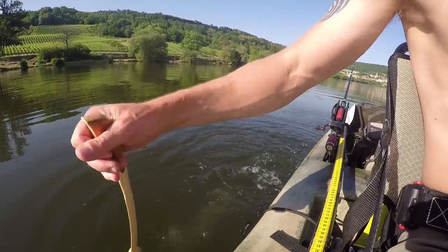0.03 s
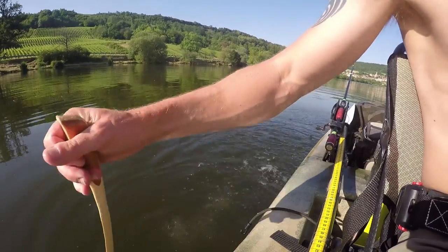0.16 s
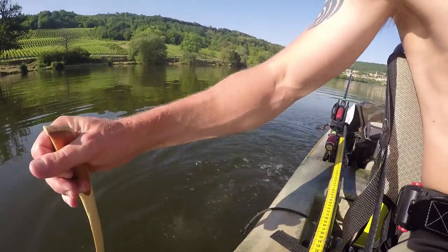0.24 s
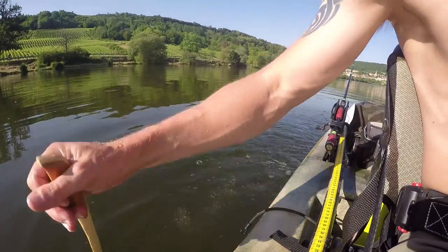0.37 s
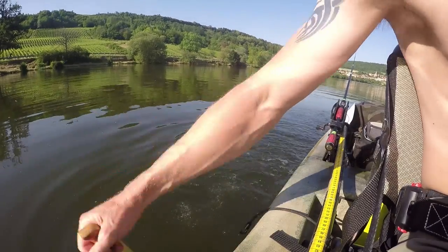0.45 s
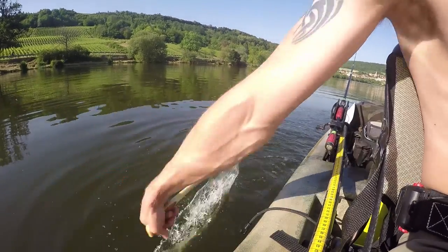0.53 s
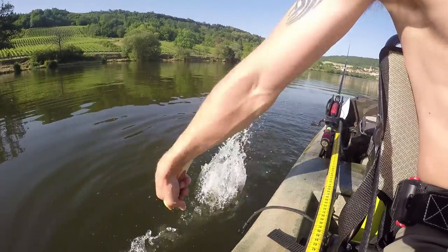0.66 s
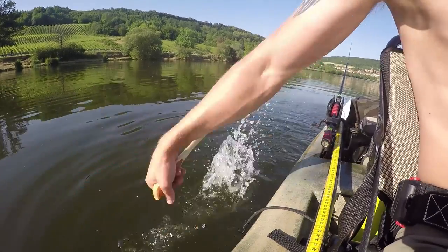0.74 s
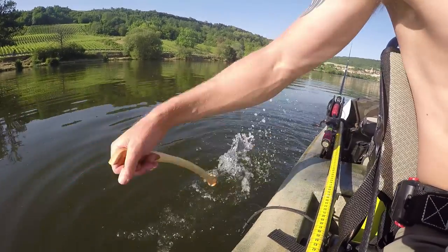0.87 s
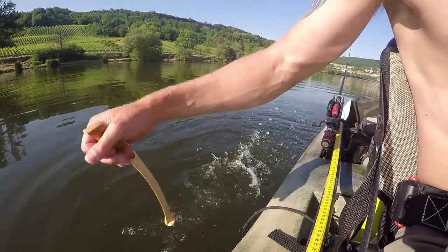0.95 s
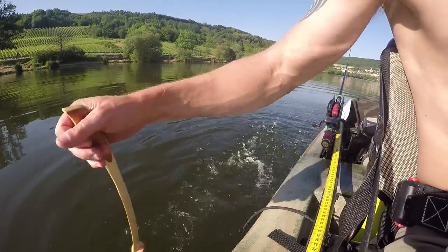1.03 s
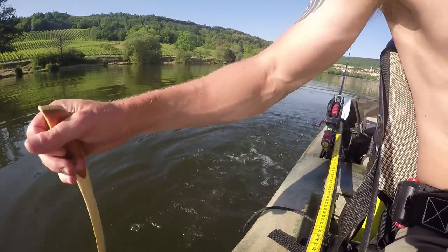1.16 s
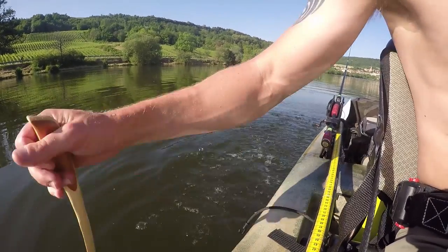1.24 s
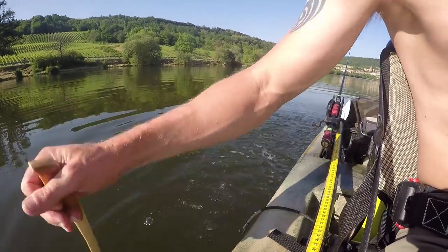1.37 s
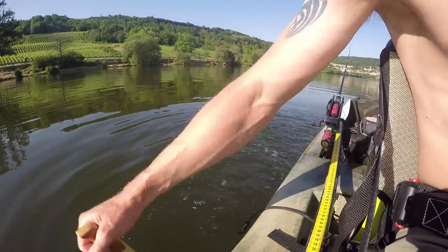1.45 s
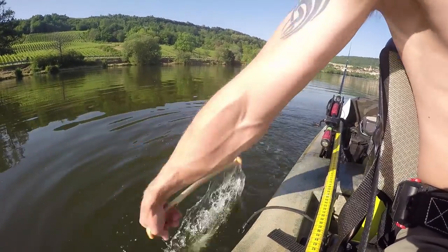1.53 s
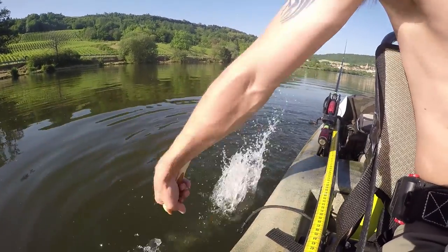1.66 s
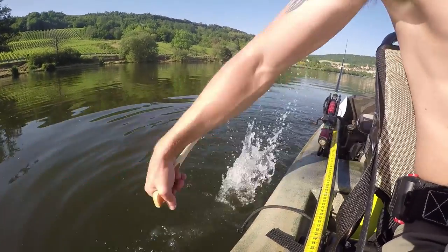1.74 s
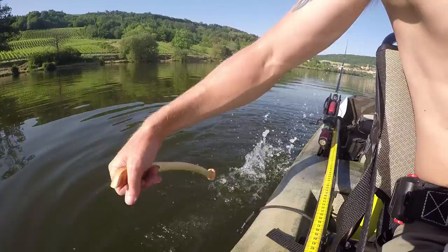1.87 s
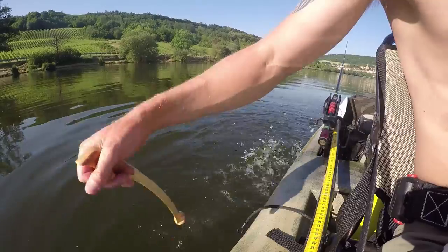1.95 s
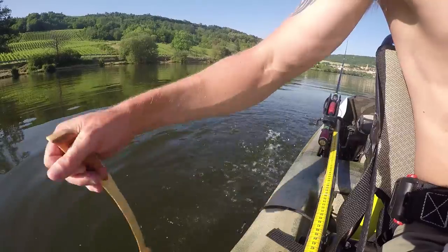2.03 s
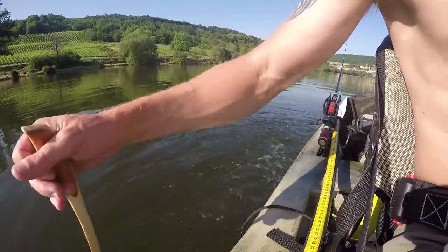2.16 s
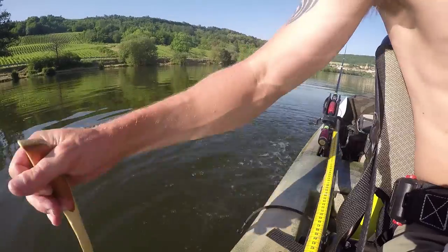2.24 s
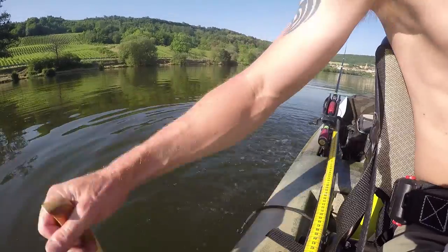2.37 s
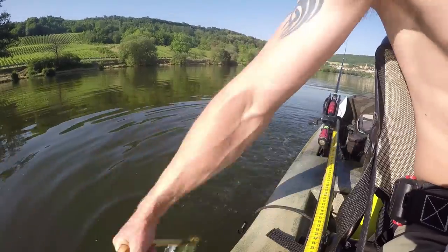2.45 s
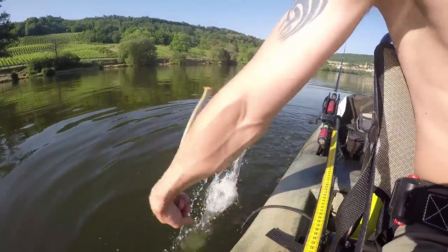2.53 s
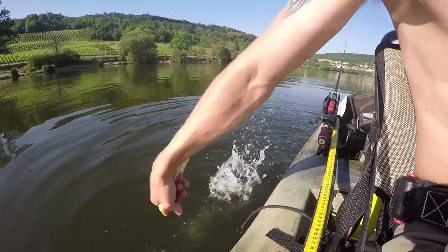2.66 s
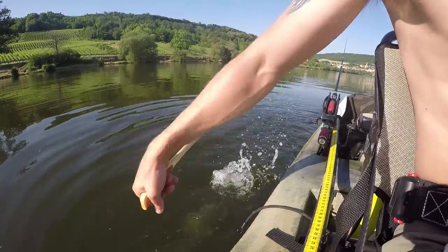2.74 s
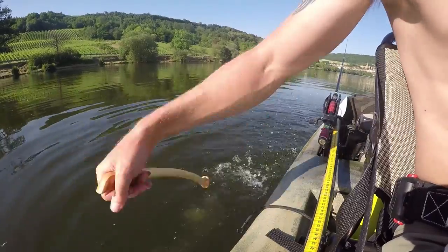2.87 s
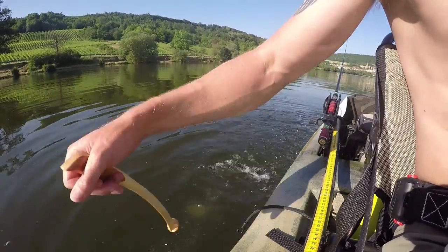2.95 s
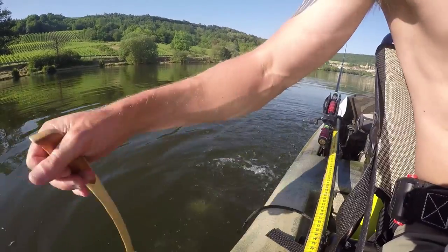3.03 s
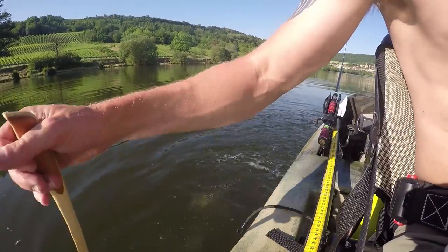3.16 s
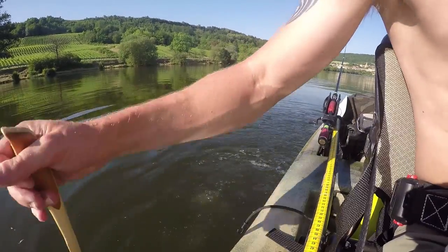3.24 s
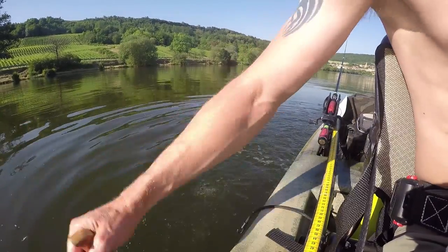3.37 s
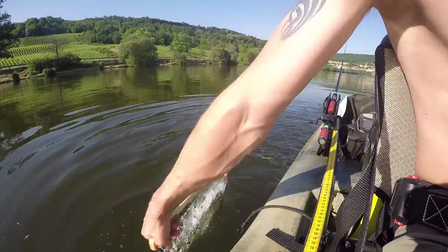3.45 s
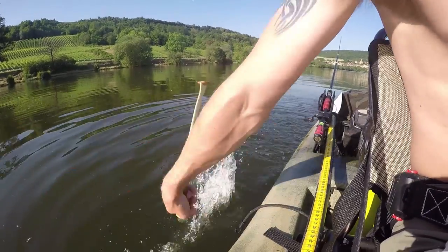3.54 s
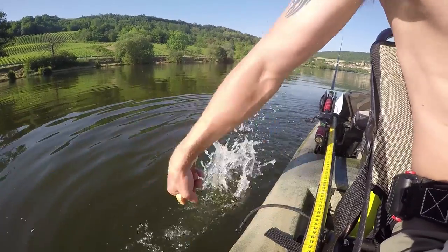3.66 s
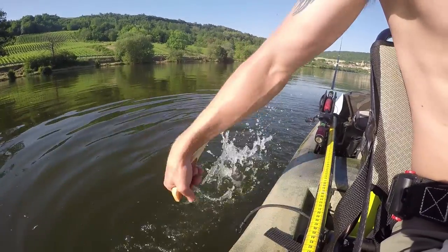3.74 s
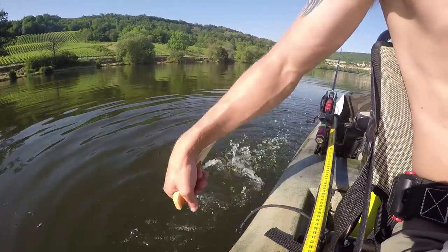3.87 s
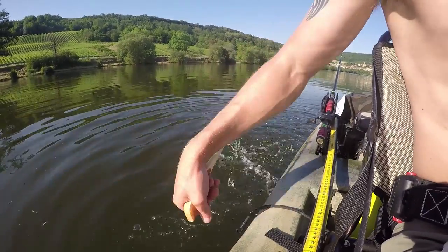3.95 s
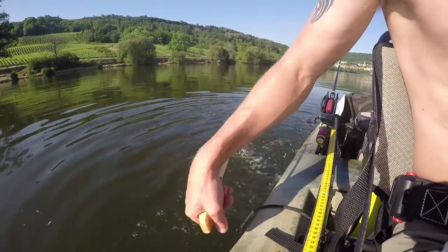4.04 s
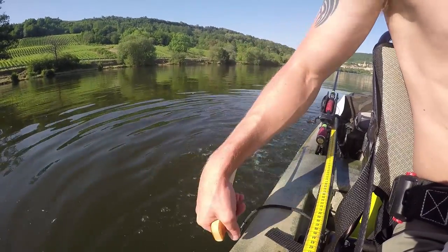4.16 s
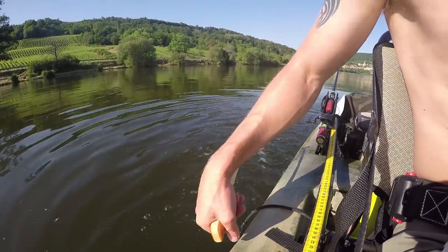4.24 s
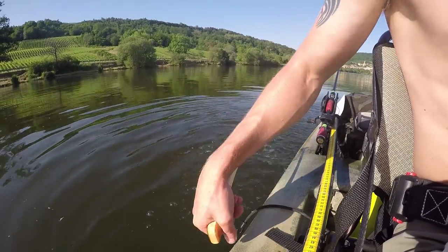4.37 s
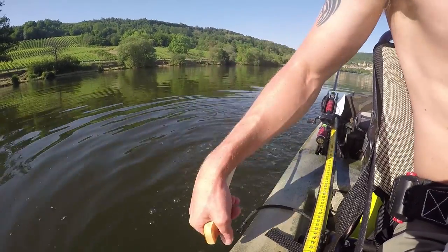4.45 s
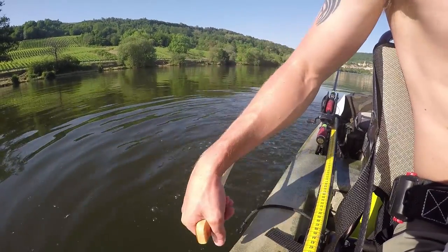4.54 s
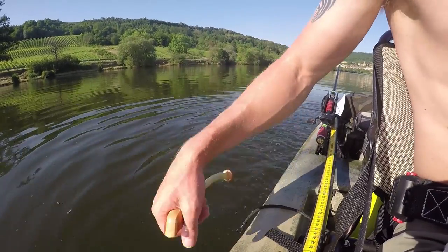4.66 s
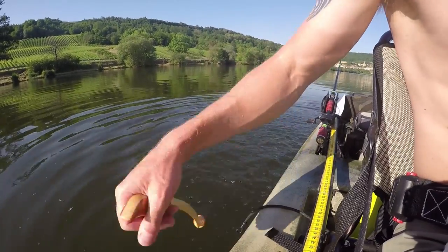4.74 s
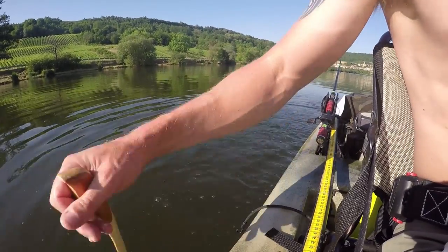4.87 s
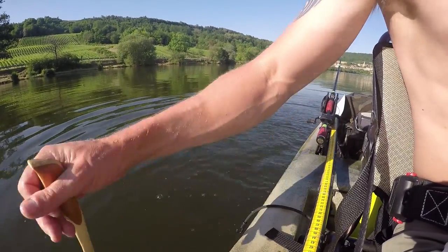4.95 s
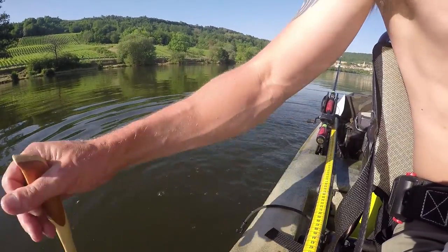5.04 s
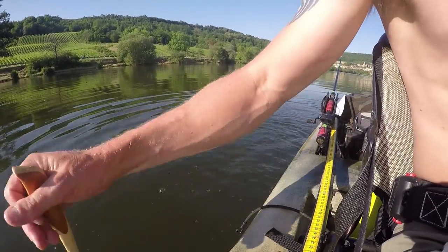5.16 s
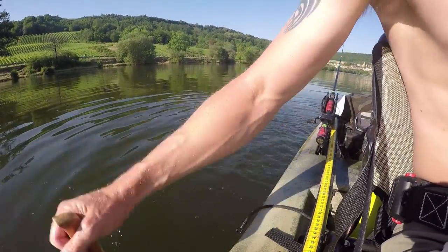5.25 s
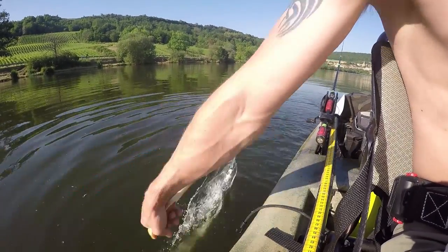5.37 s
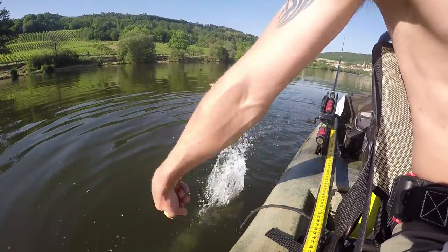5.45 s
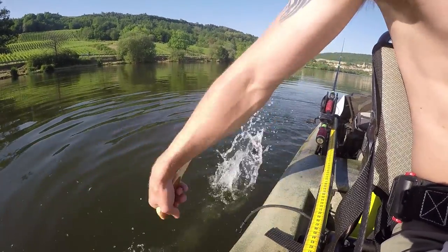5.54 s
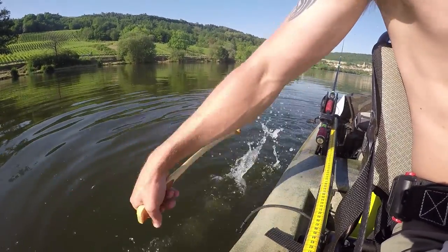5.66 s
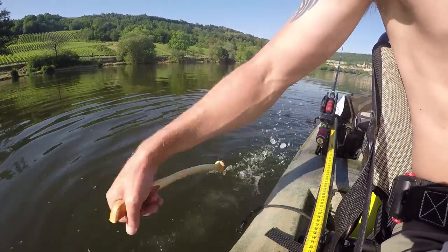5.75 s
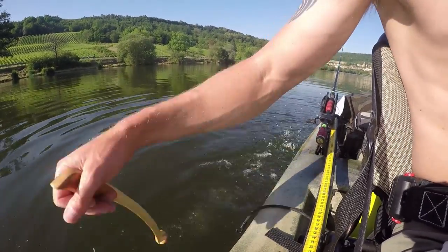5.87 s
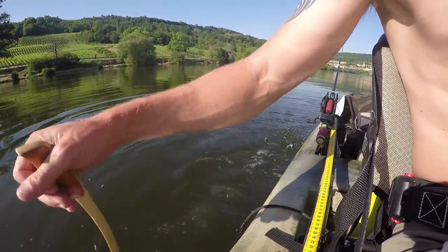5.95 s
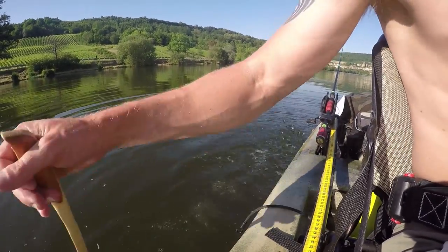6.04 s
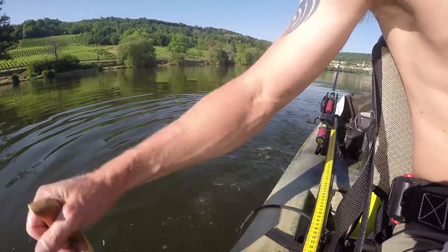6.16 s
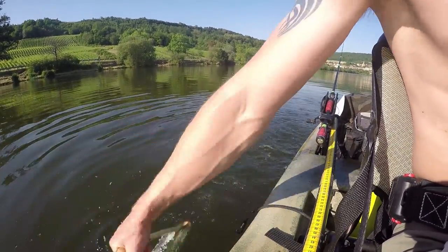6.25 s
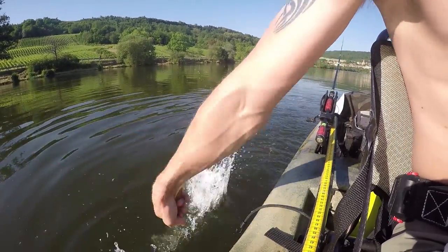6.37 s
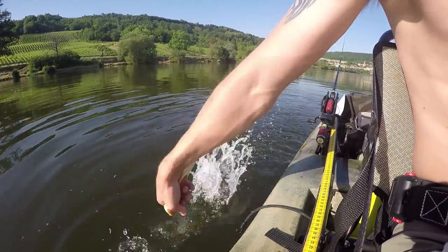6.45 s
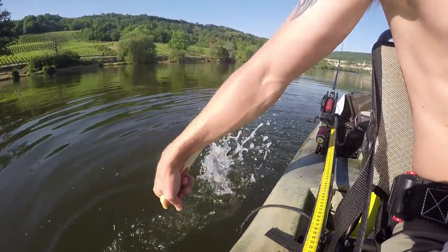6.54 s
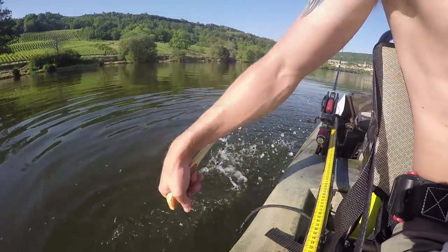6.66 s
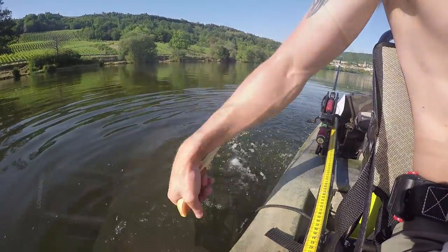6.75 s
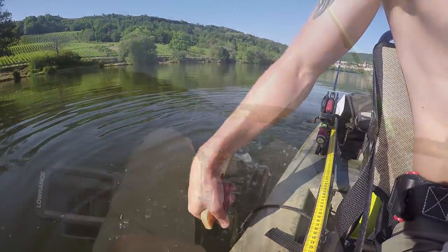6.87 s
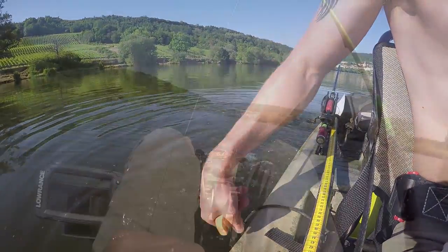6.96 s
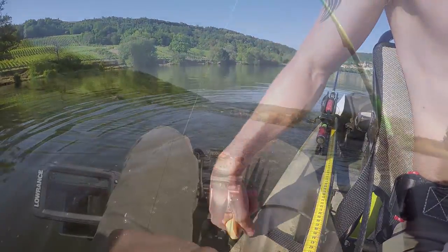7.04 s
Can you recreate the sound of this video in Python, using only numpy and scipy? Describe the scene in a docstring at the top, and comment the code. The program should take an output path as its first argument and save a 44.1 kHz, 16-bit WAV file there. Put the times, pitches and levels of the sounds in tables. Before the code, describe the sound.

A wooden clonk slaps the river surface about once a second, gulping air into deep booming plops, then droplets fizz and patter back.

```python
"""On a calm river, from an inflatable boat: a wooden clonk strikes the water six times, close to the microphone.
Each stroke slaps the surface with a ragged noise burst and a dull knock, and drags down a pocket of air,
a low throbbing tone that pinches off and rings as a rising plop.
Spray patters back as swarms of small bubbles over noise, with single drops and heavier plunks.
Light wind, as low noise, rumbles on the microphone; far off on the bank, birds whistle in gliding tones."""
import sys
import numpy as np
from scipy import signal
from scipy.fft import rfft, irfft, next_fast_len
from scipy.io import wavfile
from scipy.ndimage import uniform_filter1d, minimum_filter1d, map_coordinates

SR = 44100
rng = np.random.default_rng(int(sys.argv[2]) if len(sys.argv) > 2 else 0)


def unload_wav(signal):
    """Save mono or channel-first audio to the path in sys.argv[1] as 16-bit WAV at rate SR, clipped to [-1, 1]."""
    wavfile.write(
        sys.argv[1],
        SR,
        np.round(np.clip(np.atleast_2d(signal).T, -1, 1) * 32767).astype(np.int16),
    )


N = 313265  # length in samples

# Levels in the tables are relative: the layers and the mix add their own gains.
# breeze at the microphone: (time [s], level [dB])
BREEZE = [(0.0, -51), (1.4, -49.5), (3.3, -50), (4.8, -48.5), (5.2, -46.5), (5.8, -54), (6.3, -45),
          (7.1, -46.5)]
# spectrum of the low wind rumble: (frequency [Hz], density [dB])
RUMBLE_SPECTRUM = [(11, -40.5), (18, -2), (43, -0.5), (57, -5.5), (80, -12), (130, -16.5), (178, -21),
                   (329, -32.5), (434, -37), (600, -38), (780, -63), (1320, -120)]
# spectrum of the open air of the valley: (frequency [Hz], density [dB])
AIR_SPECTRUM = [(150, -31.5), (250, -1), (385, 0.5), (490, -9), (897, -14), (1310, -18), (2850, -18),
                (3390, -20), (3760, -20), (4240, -20), (15500, -31.5)]
# spray thrown up by a stroke: (thrown [s], flight until most lands [s], scatter of the landing [s],
# churned water [dB], first fizz [dB], landing patter [dB], landing gurgle [dB])
SHOWERS = [(-0.4, 0.36, 0.082, -60, -54, -62, -52.5), (0.65, 0.4, 0.045, -40, -50.5, -46, -51),
           (1.65, 0.37, 0.05, -43.5, -51, -45.5, -51), (2.615, 0.28, 0.042, -47.5, -54.5, -51, -54.5),
           (3.58, 0.34, 0.1, -43.5, -49, -47.5, -57), (5.483, 0.39, .06, -44, -57, -51.5, -57),
           (6.402, 0.4, 0.051, -45.5, -54, -46.5, -65.5)]
# spectrum of the fine patter: (frequency [Hz], density [dB])
PATTER_SPECTRUM = [(500, -23), (1200, -7.5), (1700, -8), (2400, 0), (3500, -7.5), (4500, -5), (6300, -7),
                   (7500, -14.5), (9500, -19), (13000, -14), (15500, -23)]
# spectrum of the lower gurgle and the splats: (frequency [Hz], density [dB])
GURGLE_SPECTRUM = [(150, -20), (400, 8), (700, 2), (1000, 2), (1500, -10.5), (2200, -18), (5000, -77)]
# loudest single drops: (time [s], level [dB], pitch [Hz])
DROPS = [(0.0725, -39.5, 3500), (0.7802, -27.5, 2700), (0.7845, -30.5, 4000), (0.892, -34, 2730),
         (0.9378, -34.5, 1640), (1.1972, -41.5, 4530), (1.263, -43.5, 3650), (1.5805, -37, 1450),
         (1.8446, -32, 2860), (1.9737, -30, 2190), (2.0473, -29.5, 1900), (2.0619, -29.5, 2360),
         (2.823, -34.5, 2600), (3.2826, -44.5, 1630), (3.801, -31, 2690), (4.0326, -32, 2310),
         (5.6466, -34, 2640), (5.773, -32.5, 2580), (5.814, -33.5, 2730), (5.828, -31.5, 2300),
         (5.8423, -22.5, 1850), (5.9419, -26, 4260), (6.654, -35.5, 3680), (6.7128, -30.5, 2720)]
# far birds: (time [s], length [s], start [Hz], middle [Hz], end [Hz], level [dB])
BIRD_CALLS = [(0.442, 0.13, 1770, 1740, 1660, -66), (1.21, 0.064, 3950, 3600, 3460, -63),
              (1.354, 0.052, 3440, 3900, 2850, -56.5), (2.169, .09, 3400, 3300, 3130, -67),
              (2.381, 0.062, 3570, 3660, 3450, -59.5), (3.216, 0.31, 1710, 1633, 1560, -65),
              (3.25, 0.052, 3350, 3190, 2860, -61.5), (4.257, 0.21, 2870, 2290, 2030, -67),
              (4.48, 0.056, 3200, 3180, 2940, -63.5), (4.55, 0.062, 2540, 2530, 2500, -63),
              (4.66, 0.072, 2370, 2310, 2400, -67.5)]
# blade cutting the surface: (time [s], thin hiss [dB], surge ahead of the head [dB], tearing at pinch-off [dB])
BLADE_CUTS = [(0.572, -48, -24, -30.5), (1.580, -43.5, -30, -32), (2.545, -46, -31.5, -35.5),
              (3.505, -44, -23, -30.5), (5.391, -46.5, -45, -33.5), (6.333, -45.5, -22.5, -33)]
# spectrum of the blade's thin hiss: (frequency [Hz], density [dB])
SLICE_SPECTRUM = [(400, -4), (1200, -14), (2600, -8), (4500, -6.5), (6300, -6.5), (8000, -19.5),
                  (15500, -16.5)]
# slaps of the head and the water behind it: (time [s], level [dB], brightness [dB per octave])
SLAP_HITS = [(0.613, -31.5, 4), (.633, -20.5, 0.5), (.6365, -19, 0), (1.6261, -17, -1), (1.632, -27, -3),
             (2.568, -20.5, -0.5), (2.617, -24, -6), (3.541, -30.5, -1), (3.565, -14.5, -4.5),
             (3.574, -14.5, -6), (5.4263, -16, -2.5), (6.394, -27.5, 1.5), (6.398, -26, -10)]
# spectrum of a slap before its brightness tilt: (frequency [Hz], density [dB])
SLAP_SPECTRUM = [(150, -37.5), (450, 0), (750, -6.5), (1300, -7.5), (2300, -2), (3200, -10), (4200, -8),
                 (6200, -13), (7800, -20.5), (11000, -21.5), (15500, -25.5)]
# wooden head meeting the water: (time [s], level [dB])
HEAD_KNOCKS = [(0.631, -8.5), (1.622, -8.5), (2.564, -15.5), (3.556, -16), (5.421, -9), (6.386, -16.5)]
# spectrum of the wooden head: (frequency [Hz], density [dB])
WOOD_SPECTRUM = [(100, -39), (250, 13), (430, 5), (700, -14), (1200, -24.5), (3000, -48)]
# dragged air pocket: (pinch-off [s], open before that for [s], throb [dB], plop [dB],
# start [Hz], end [Hz], glide [s], ring [s])
STROKES = [(0.6502, 0.015, -7.5, 0.9, 145, 432.5, 0.029, 0.028),
           (1.6514, 0.024, -6.5, .5, 172, 386, 0.014, 0.026),
           (2.6150, 0.045, -10, 1.5, 169, 428, 0.007, 0.017),
           (3.579, 0.017, -9.5, 0.1, 157, 372.5, 0.0238, 0.034),
           (5.483, .058, -12.5, -3.5, 243, 480, 0.017, 0.022),
           (6.402, 0.0085, -11, 1.5, 131, 457, 0.033, 0.036)]
# larger lumps of water plunging in: (time [s], level [dB], pitch [Hz])
LUMPS = [(0.724, -25.5, 480), (0.863, -37, 600), (0.894, -30.5, 856), (0.974, -21.5, 349),
         (0.988, -29, 417), (1.858, -32.5, 1075), (2.101, -35, 460), (2.752, -34, 785), (3.786, -20, 400),
         (3.918, -30.5, 530), (3.977, -33, 937), (4.075, -37, 1000), (4.482, -33.5, 388),
         (5.836, -31.5, 1090)]
# resonances of the microphone's housing: (frequency [Hz], width [Hz], level over the direct sound [dB])
HOUSING_MODES = [(1093, 140, 0), (1492, 36, -12.5), (2735, 170, -2), (4620, 146, 2.5), (5420, 110, -2.5),
                 (12560, 1410, -6.5)]

AIR_DB = -58.5
CHURN_DB_PER_S, CHURN_LOW_DB = 116, 4  # settling of the churned water; its gurgle over its patter
FIZZ_LOW_DB, TRAIL_DB_PER_S = -4, 61  # gurgle under the first fizz; thinning of the stragglers
WASH_DB, WASH_RISE_S, WASH_DB_PER_S = -34, 0.068, 39.5  # heave of the water after each stroke
TOP_HZ = 15600  # band limit


def amp(db):
    """Decibels to gain."""
    return 10 ** (np.asarray(db) / 20)


def unit(x):
    """x scaled to rms 1."""
    return x / np.sqrt(np.mean(x ** 2) + 1e-20)


def seconds(length):
    """A time axis of the given length in seconds."""
    return np.arange(int(length * SR)) / SR


def add(track, s, sound):
    """Mix a sound into the track at time s."""
    start = max(round(s * SR), 0)
    track[start:start + len(sound)] += sound[:len(track) - start]


def wobble(rate):
    """A smooth random curve, rate knots a second."""
    knots = rng.standard_normal(int(N * rate / SR) + 4)
    return map_coordinates(knots, [np.arange(N) * rate / SR])


def coloured(x, spectrum):
    """x shaped by (frequency [Hz], density [dB]) points, at rms 1."""
    hz, db = np.transpose(spectrum)
    grid = np.fft.rfftfreq(len(x), 1 / SR)
    gain = amp(np.interp(np.log(grid + 1), np.log(hz), db))
    return unit(irfft(rfft(x) * gain, len(x)))


def noise(spectrum, size):
    """Random noise coloured by a spectrum."""
    return coloured(rng.standard_normal(next_fast_len(size)), spectrum)[:size]


def bubble(t, hz, cycles, rise):
    """A small bubble dies within some cycles while its pitch climbs."""
    age = t * hz / cycles
    tone = np.sin(2 * np.pi * hz * t * (1 + rise * np.tanh(age / 2) / 2))
    return tone * np.exp(-age) * (1 - np.exp(-2 * t * hz))


def bubbles(low_hz, high_hz, cycles, spread_db, count):
    """A steady swarm of bubbles of random pitch and strength, rms 1."""
    when, pitch, size = rng.random((count, 3)).T[:, :, None]
    hz = low_hz * (high_hz / low_hz) ** pitch
    t = seconds(min(10 / low_hz, .012))
    strength = np.sqrt(hz) * amp(-spread_db * np.log(size + .02))
    fade_out = 1 - (t / t[-1]) ** 4
    grains = strength * bubble(t, hz, cycles, .15) * fade_out
    index = (when * N).astype(int) + np.arange(len(t))
    return unit(np.bincount(index.ravel(), grains.ravel(), N)[:N])


def outdoors(wind_db=3, gust_db=2, air_db=-1):
    """Light wind rumbles on the microphone over the faint hiss of the valley, both as wavering noise."""
    s, db = np.transpose(BREEZE)
    breeze_db = np.interp(np.arange(N) / SR, s, db) + wind_db + gust_db * wobble(4.1)
    rumble = amp(breeze_db) * noise(RUMBLE_SPECTRUM, N)
    air = amp(AIR_DB + air_db + 0.64 * wobble(3.9)) * noise(AIR_SPECTRUM, N)
    return rumble + air


def spray(patter_db=-3, gurgle_db=-2.5, mist=0.9, drip=0.56, clump_db=2.0, swell_s=0.01):
    """Churned water settles, thrown water fizzes and lands in clumps: fine patter with drips over a gurgle."""
    t = np.arange(N) / SR
    high_power, low_power = np.zeros(N), np.zeros(N)
    for thrown, flight, scatter, churn_db, fizz_db, land_db, land_low_db in SHOWERS:
        age = np.maximum(t - thrown, 0)
        swell = 1 - np.exp(-age / swell_s)
        churn = swell * amp(churn_db - CHURN_DB_PER_S * age)
        # stragglers trail off once most has landed
        fizz = swell * amp(fizz_db - TRAIL_DB_PER_S * np.maximum(age - flight, 0))
        landing = swell * np.exp(-((age - flight) / scatter) ** 2 / 2)
        high_power += churn ** 2 + fizz ** 2 + (amp(land_db) * landing) ** 2
        low_power += (amp(CHURN_LOW_DB) * churn) ** 2 + (amp(FIZZ_LOW_DB) * fizz) ** 2
        low_power += (amp(land_low_db) * landing) ** 2
    fine = bubbles(1337, 15000, cycles=13.0, spread_db=2.5, count=11000)
    drips = bubbles(1210, 7000, cycles=2.0, spread_db=4.0, count=450)
    patter = coloured(fine + drip * drips + mist * rng.standard_normal(N), PATTER_SPECTRUM)
    lower = bubbles(410, 1920, cycles=7.8, spread_db=2.0, count=2000)
    gurgle = coloured(lower + mist * rng.standard_normal(N), GURGLE_SPECTRUM)
    high = amp(patter_db) * np.sqrt(high_power) * patter
    low = amp(gurgle_db) * np.sqrt(low_power) * gurgle
    return (high + low) * amp(clump_db * wobble(90))


def drops(tick_db=-8, tick_t60_s=0.028, ring_db=1.0):
    """Each drop ticks on the surface and traps a small bubble; the tick is coloured around its pitch."""
    out, t = np.zeros(N), seconds(.05)
    for s, db, hz in DROPS:
        colour = [(hz / 4, -20), (hz * .7, -3), (hz, 0), (hz * 1.5, -7), (hz * 3, -22)]
        decay = amp(tick_db - 60 * t / tick_t60_s)
        tick = decay * noise(colour, len(t)) * (1 - np.exp(-t / 0.00036))
        ring = amp(ring_db) * bubble(t, hz, cycles=4.3, rise=0.057)
        add(out, s, amp(db) * (tick + ring))
    return out


def birds(bird_db=-1):
    """Thin whistles from the bank, each gliding through three pitches with a slight waver."""
    out = np.zeros(N)
    for s, length, *pitch_hz, db in BIRD_CALLS:
        u = seconds(length) / length
        glide = np.polyval(np.polyfit([0, .5, 1], pitch_hz, 2), u)
        hz = glide * (1 + 0.006 * wobble(149)[:len(u)])
        whistle = np.sin(2 * np.pi * np.cumsum(hz) / SR)
        add(out, s, amp(db + bird_db) * np.sin(np.pi * u) * whistle)
    return out


def cuts(surge_rise_s=0.01, surge_fade_s=0.0095, tear_rise_s=0.0091, tear_fade_s=0.033):
    """The blade slices in with a thin hiss, water surges ahead of the head and tears as the pocket closes."""
    t = np.arange(N) / SR
    thin, churn = np.zeros(N), np.zeros(N)
    for (s, hiss_db, surge_db, tear_db), (pinch, open_s, *_) in zip(BLADE_CUTS, STROKES):
        entry = pinch - open_s
        fade_in = np.clip((t - s) / 0.0042, 0, 1)
        fade_out = np.clip((entry - t) / .01 + 1, 0, 1)
        thin += amp(hiss_db) * fade_in * fade_out
        surge_s = np.where(t < entry, surge_rise_s, surge_fade_s)
        churn += amp(surge_db) * np.exp(-np.abs(t - entry) / surge_s)
        tear_s = np.where(t < pinch, tear_rise_s, tear_fade_s)
        churn += amp(tear_db) * np.exp(-np.abs(t - pinch) / tear_s)
    swarm = bubbles(580, 13370, cycles=3.5, spread_db=4, count=9000)
    fizz = coloured(swarm + rng.standard_normal(N), SLAP_SPECTRUM)
    hiss = thin * amp(4.6 * wobble(130)) * noise(SLICE_SPECTRUM, N)
    return hiss + churn * fizz


def slaps(fade_s=0.0041, rise_s=0.0021, rough_db=3):
    """Each slap is a ragged crack of a few milliseconds with its own brightness."""
    out = np.zeros(N)
    u = seconds(.05) - .01  # time around the blow
    for s, slap_db, tilt_db in SLAP_HITS:
        colour = [(hz, db + tilt_db * np.log2(hz / 2000)) for hz, db in SLAP_SPECTRUM]
        blow = np.exp(-np.abs(u) / np.where(u < 0, rise_s, fade_s))
        add(out, s + u[0], amp(slap_db) * blow * noise(colour, len(u)))
    return out * amp(rough_db * wobble(600))


def knocks(knock_db=-1, t60_s=0.046):
    """The wooden head gives a short dull knock on contact, a decaying burst of low noise."""
    out, t = np.zeros(N), seconds(.06)
    for s, db in HEAD_KNOCKS:
        decay = amp(db + knock_db - 60 * t / t60_s)
        add(out, s, decay * (1 - np.exp(-t / 0.00046)) * noise(WOOD_SPECTRUM, len(t)))
    return out


def plops(pocket_hz=82, pocket_fade_s=0.05, pocket_hold=0.32, close_s=0.00094, ebb=1.66, burst=1.86):
    """The open air pocket throbs low; sealed, it rings loudly and climbs in pitch until it breaks up."""
    out, t = np.zeros(N), seconds(.2)
    for pinch, open_s, pocket_db, plop_db, start_hz, end_hz, glide, ring in STROKES:
        age = np.maximum(t - open_s, 0)
        sealed = (1 + np.tanh((t - open_s) / close_s)) / 2  # 0 open, 1 closed
        climb = end_hz + (start_hz - end_hz) * np.exp(-age / glide)
        hz = pocket_hz + sealed * (climb - pocket_hz)
        throb = amp(pocket_db) * (pocket_hold + (1 - pocket_hold) * np.exp(-t / pocket_fade_s))
        break_up = 1 + (age / (burst * ring)) ** 8
        plop = amp(plop_db) * np.exp(-(age / ring) ** ebb) / break_up
        tone = -np.sin(2 * np.pi * np.cumsum(hz) / SR)
        add(out, pinch - open_s, tone * ((1 - sealed) * throb + sealed * plop))
    return out


def hull(tube_hz=86, tube_db=-22, t60_s=0.47):
    """The boat's air tube hums briefly from each pinch-off, more so when the pocket has long been open."""
    out, t = np.zeros(N), seconds(.6)
    for pinch, open_s, _, plop_db, *_ in STROKES:
        hz = tube_hz * (1 + rng.normal(0, .04))
        hum = np.tanh(open_s / 0.03) * np.sin(2 * np.pi * hz * t)
        decay = amp(plop_db + tube_db - 60 * t / t60_s)
        add(out, pinch, hum * decay * (1 - np.exp(-t / .015)))
    return out


def wash():
    """After each stroke the water heaves against the boat with a low rumble and settles."""
    t = np.arange(N) / SR
    heave = np.zeros(N)
    for pinch, *_ in STROKES:
        age = np.maximum(t - pinch, 0)
        heave += (1 - np.exp(-age / WASH_RISE_S)) * amp(WASH_DB - WASH_DB_PER_S * age)
    return heave * noise(RUMBLE_SPECTRUM, N)


def fragments(piece_db=-30, spread_s=.045, count=5):
    """The big bubble breaks into pieces that ring on softly near its last pitch, later ones weaker."""
    out, t = np.zeros(N), seconds(.1)
    for pinch, _, _, plop_db, _, end_hz, _, ring in STROKES:
        for late, size in rng.random((count, 2)):
            piece_hz = end_hz * (.88 + 0.38 * size * late)
            piece = bubble(t, piece_hz, cycles=8.5, rise=0.083)
            level = amp(plop_db + piece_db - 14.2 * late)
            add(out, pinch + 1.1 * ring + spread_s * late, level * piece)
    return out


def plunks(splat_db=-3.5, splat_t60_s=0.032, ring_db=-5):
    """Lumps of water land with a dull splat of noise and a larger bubble."""
    out, t = np.zeros(N), seconds(0.11)
    for s, db, hz in LUMPS:
        decay = amp(splat_db - 60 * t / splat_t60_s)
        splat = decay * noise(GURGLE_SPECTRUM, len(t)) * (1 - np.exp(-t / .0005))
        ring = amp(ring_db) * bubble(t, hz, cycles=4.5, rise=0.096)
        add(out, s, amp(db) * (splat + ring))
    return out


def reflections(x, t60_s, delay_s):
    """A scattered, dying answer from nearby surfaces: convolution with a decaying noise tail."""
    t = seconds(.6)
    onset = np.clip(t / delay_s - 1, 0, 1)
    tail = rng.standard_normal(len(t)) * amp(-60 * t / t60_s) * onset
    return signal.fftconvolve(x, tail / np.linalg.norm(tail))[:N]


def housing(x):
    """The direct sound plus the narrow resonances of the microphone's case."""
    size = next_fast_len(N + SR // 2)
    f = np.fft.rfftfreq(size, 1 / SR)
    response = 1
    for hz, width, db in HOUSING_MODES:
        response = response + amp(db) * 1j * f * width / (hz * hz - f * f + 1j * f * width)
    return irfft(rfft(x, size) * response, size)[:N]


def scene():
    """Close water sounds with a weak answer from the boat, far birds and the open air."""
    splash = housing(amp(-3.5) * slaps() + amp(-3.0) * cuts() + spray() + amp(-2.0) * drops())
    water = plops() + fragments() + amp(-1.5) * knocks() + plunks() + splash
    boat = amp(-20.0) * reflections(water, t60_s=0.12, delay_s=0.0044)
    song = birds()
    bank = amp(-16.5) * reflections(song, t60_s=.4, delay_s=.02)
    return (water + boat + hull() + wash() + song + bank + outdoors())[None]


def record(dry, ceiling=0.99, hold_s=0.003):
    """A fast limiter turns down the loudest swings; nothing is kept above the band limit."""
    span = max(int(hold_s * SR), 1)
    needed = np.minimum(1, ceiling / (np.abs(dry) + 1e-9))
    gain = uniform_filter1d(minimum_filter1d(needed, 2 * span + 1), span)
    size = next_fast_len(N + SR // 2)
    passband = np.fft.rfftfreq(size, 1 / SR) < TOP_HZ
    return irfft(rfft(dry * gain, size) * passband, size)[:, :N]


dry = scene()
out = record(dry)
unload_wav(out)
```